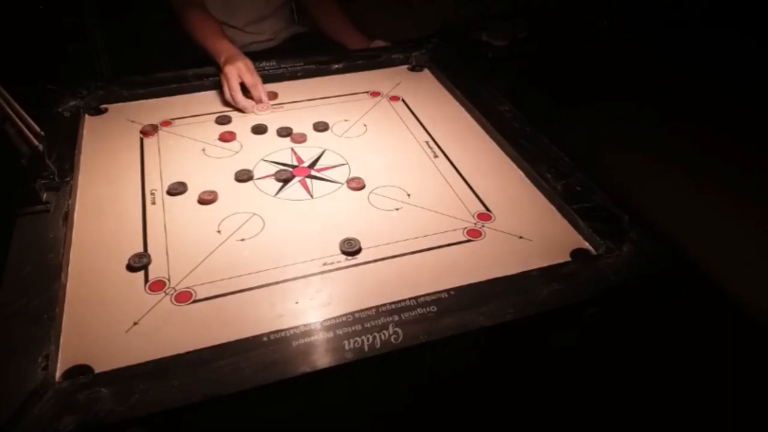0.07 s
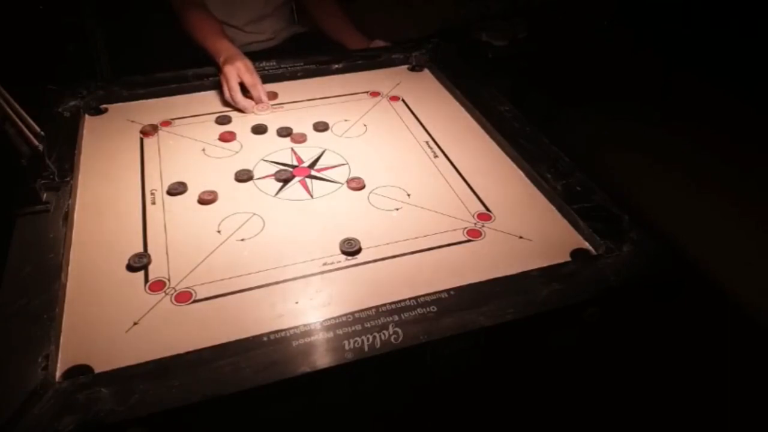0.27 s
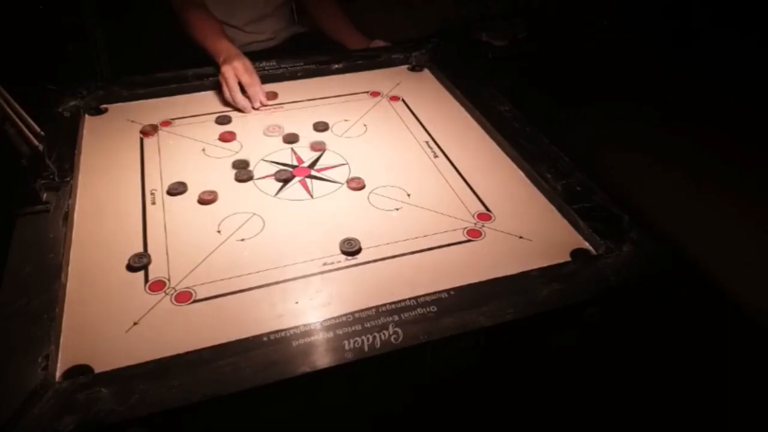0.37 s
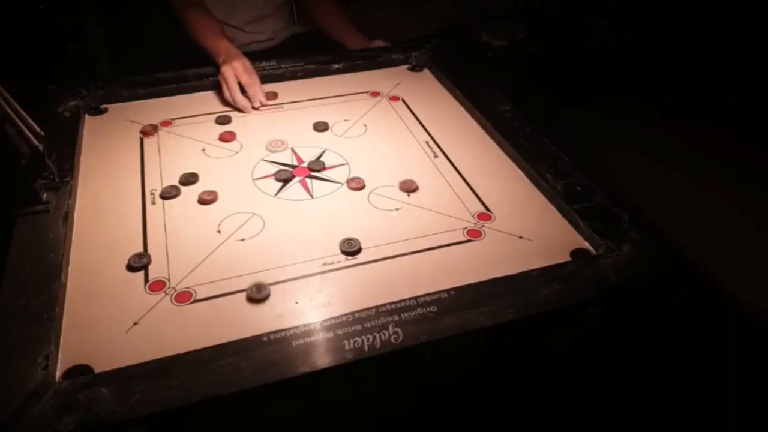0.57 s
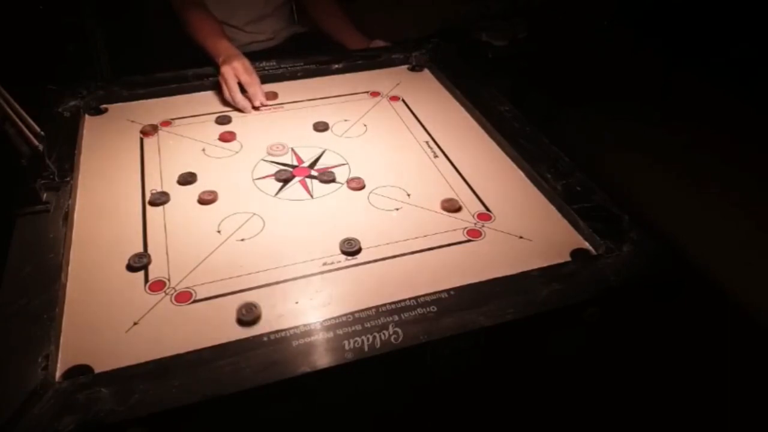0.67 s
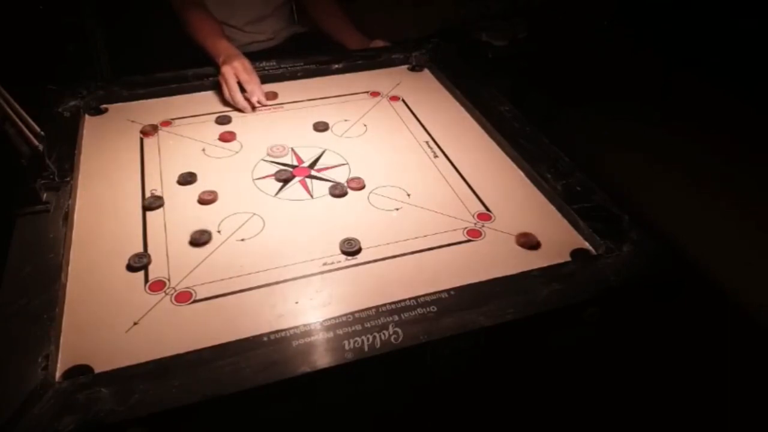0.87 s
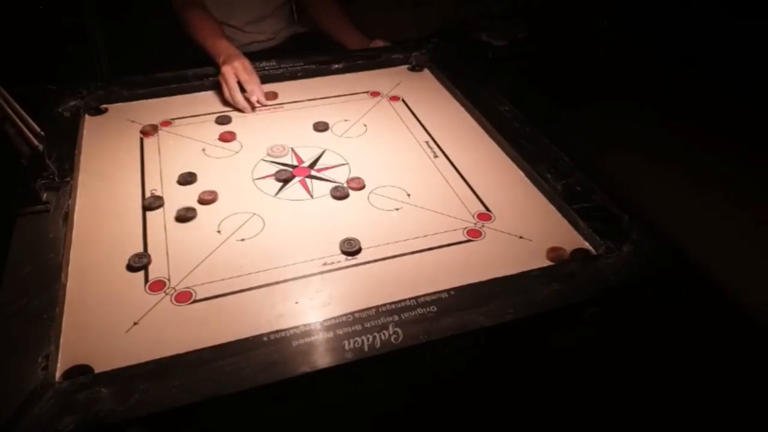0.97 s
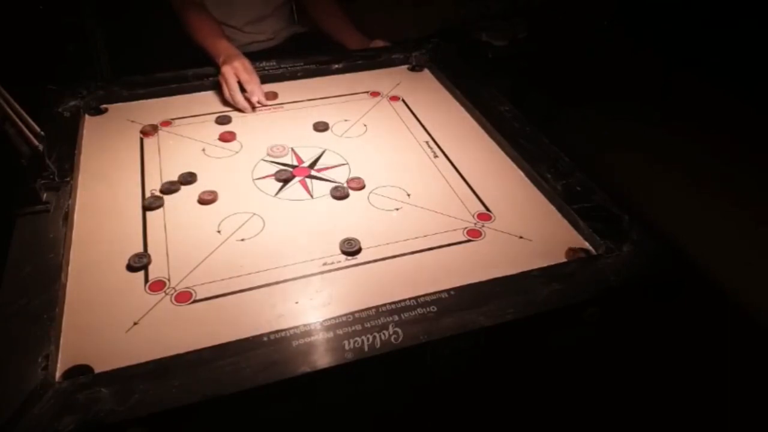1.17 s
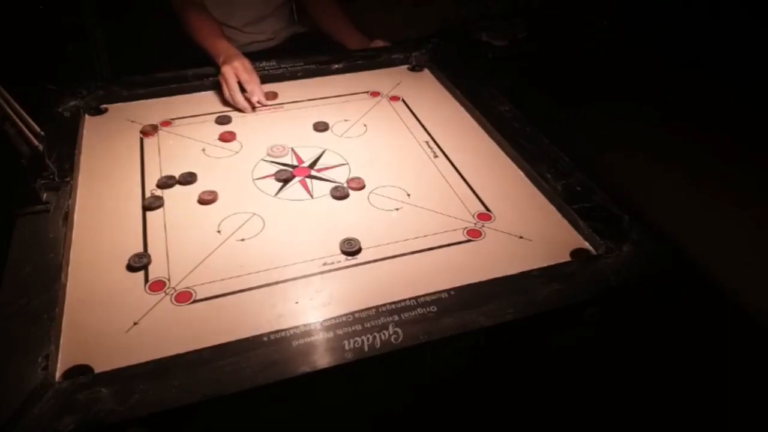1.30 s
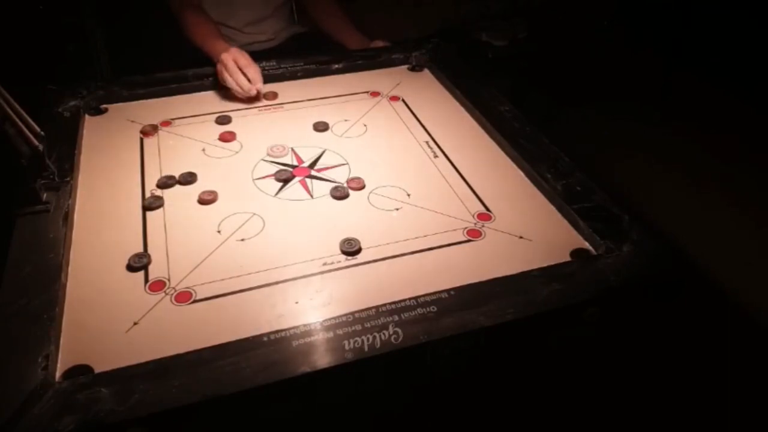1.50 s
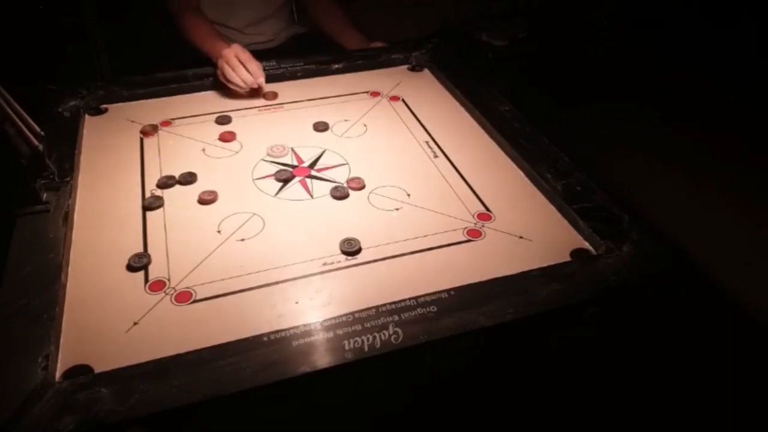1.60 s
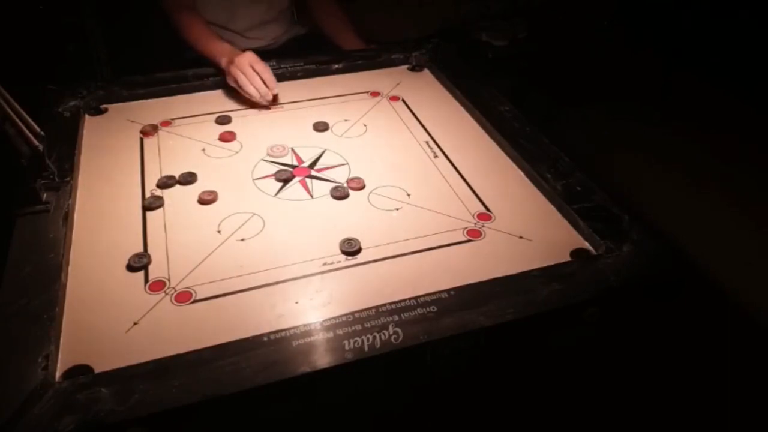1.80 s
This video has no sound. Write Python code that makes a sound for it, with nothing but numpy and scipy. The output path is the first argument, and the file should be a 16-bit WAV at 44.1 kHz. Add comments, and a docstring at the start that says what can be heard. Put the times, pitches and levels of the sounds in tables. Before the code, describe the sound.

Sharp wooden clacks and knocks of one carrom shot, echoing briefly in a quiet room.

```python
"""A carrom shot in a quiet room

A finger flicks the striker, which skids and drums over the plywood and clacks into wooden discs.
Discs knock against the frame and excite its modes; the hard-walled room reverberates after each blow.
Near the end a hand brushes the board. A low rumble and a faint mains hum lie underneath."""
import sys
import numpy as np
from scipy import signal
from scipy.fft import irfft
from scipy.io import wavfile

SR = 44100
rng = np.random.default_rng(int(sys.argv[2]) if len(sys.argv) > 2 else 0)


def pcm_store(signal):
    """Save signal as 16-bit PCM."""
    levels = np.round(np.clip(np.atleast_2d(signal), -1, 1) * 32767)
    wavfile.write(sys.argv[1], SR, levels.astype(np.int16).T)


N = 81585
T = np.arange(N) / SR
HZ = np.fft.rfftfreq(N, 1 / SR)


def amp(db):
    """Converts decibels to an amplitude ratio."""
    return 10 ** (np.asarray(db) / 20)


def curve_at(points, hz):
    """Interpolates a curve on a logarithmic frequency axis."""
    f, value = np.transpose(points)
    return np.interp(np.log(hz + 1), np.log(f + 1), value)


def unit(x):
    """Normalises to unit energy."""
    return x / np.sqrt(np.sum(x ** 2) + 1e-30)


def conv(a, b):
    """Convolution, padded or cut to the scene's length."""
    return np.pad(signal.fftconvolve(a, b), (0, N))[:N]


def add(mix, start_s, sound):
    """Superposition: adds a sound at a given time."""
    part = mix[max(round(start_s * SR), 0):][:len(sound)]
    part += sound[:len(part)]


def noise(gain):
    """Random phases turn an amplitude spectrum into stationary noise of unit rms."""
    return unit(irfft(gain * np.exp(2j * np.pi * rng.random(len(HZ))), N)) * np.sqrt(N)


def pulse(spectrum, tilt_db=0, top_hz=SR, low_hz=1, size=2048):
    """Minimum phase gives the shortest causal pulse of a spectrum, tilted per octave above 1 kHz."""
    hz = np.maximum(abs(np.fft.fftfreq(size, 1 / SR)), SR / size)
    gain = amp(curve_at(spectrum, hz) + tilt_db * np.log2(np.maximum(hz, 1000) / 1000))
    gain = gain / np.sqrt(1 + (hz / top_hz) ** 4 + (low_hz / hz) ** 6) + 1e-5
    log_response = np.conj(signal.hilbert(np.log(gain)))
    return unit(np.fft.ifft(np.exp(log_response)).real)


def ring(modes, rise_s, pitch=1, top_hz=SR):
    """Free vibration is a sum of damped modes; a soft contact barely excites the high ones."""
    t = T[:SR // 2]
    tones = np.zeros(len(t))
    for k, (hz, db, t60) in enumerate(modes):
        mode = amp(db - 60 * t / t60) * np.sin(2 * np.pi * hz * pitch * t)
        tones += (-1) ** k * mode / np.hypot(1, (hz * pitch / top_hz) ** 2)
    return unit(tones * np.minimum(t / rise_s, 1))


def burst(t60_s, rise_s):
    """Modal overlap: dense, short-lived vibrations merge into decaying noise."""
    t = T[:SR // 4]
    envelope = np.minimum((t + 1 / SR) / rise_s, 1) * amp(-60 * t / t60_s)
    return unit(rng.choice([-1., 1.], len(t)) * envelope)


# Spectrum of the room's air: (frequency [Hz], relative level [dB])
AIR_SPECTRUM = [(22, -63.5), (32, -39), (42, -3.5), (60, -10), (85, -11), (125, -8.5), (165, -20),
                (240, -14), (350, -26), (450, -21), (700, -23), (950, -27.5), (1150, -26), (1750, -38.5),
                (2450, -33), (3400, -48), (5200, -51), (7500, -47.5), (9700, -61.5), (12000, -55),
                (15000, -61.5)]
# Bands of rumble and hum: (centre frequency [Hz], bandwidth [Hz], level before any swell [dB])
HUM_BANDS = [(46.6, 9, -51.5), (99.6, 6.9, -60.5), (195.4, 6, -71.5), (284.2, 27, -68), (770.5, 120, -67)]
# Swell of the two lowest bands: (time [s], gain [dB])
RUMBLE_SWELL = [(0, -19), (0.27, 3), (0.52, -8.5), (0.65, -5), (0.93, 5.5), (1.1, -9.5), (1.35, -10.5),
                (1.52, 4.5), (1.85, -9.5)]
def background(air_db=-52.5):
    """Ambient noise: broadband air and narrow bands of hum, the lowest two amplitude-modulated."""
    bands = [amp(db) * noise(1 / (1 + (2 * (HZ - hz) / width) ** 4)) for hz, width, db in HUM_BANDS]
    swell = amp(np.interp(T, *np.transpose(RUMBLE_SWELL)))
    air = amp(air_db) * noise(amp(curve_at(AIR_SPECTRUM, HZ)))
    return air + sum(bands[:2]) * swell + sum(bands[2:])


# Spectrum of the grainy hiss: (frequency [Hz], relative level [dB])
HISS_SPECTRUM = [(200, -12.5), (1700, -3), (2600, -6), (3600, -5.5), (4800, -10.5), (5800, -2.5),
                 (6600, -6), (7900, -2), (9400, -10.5), (11500, -4.5), (15000, -16.5)]
# Thin ring in the hiss: (frequency [Hz], relative level [dB], T60 [s])
HISS_MODES = [(5810, 0, .015), (8134, -1.5, 0.013), (9300, -0.5, 0.017)]
# A faint high hiss dying away at the start, before the flick; the later rows are slides on the board:
# (start [s], duration [s], initial level [dB], level change [dB], tilt [dB/octave])
HISSES = [(0, 0.071, -66.5, -13, 0.5), (0.159, 0.052, -67.5, 1.5, -4.5), (0.2063, 0.081, -38, -5.5, -3),
          (0.367, 0.68, -58, -2.5, -5.5), (1.607, 0.088, -68, -4.5, 0.5)]
def hisses(attack_s=0.0092, release_s=0.01, grain_db=3, modes_db=-14):
    """A faint high hiss dies away; later, sliding friction makes the discs hiss and ring thinly."""
    out = np.zeros(N)
    resonance = amp(modes_db) * ring(HISS_MODES, rise_s=0.0001)
    resonance[0] += 1  # the grains are also heard directly
    for start, length, db, change_db, tilt_db in HISSES:
        grains = rng.standard_normal(N) * amp(grain_db * rng.standard_normal(N))
        hiss = unit(conv(conv(grains, resonance), pulse(HISS_SPECTRUM, tilt_db))) * np.sqrt(N)
        envelope = np.minimum(T / attack_s, 1) * np.exp(-np.maximum(T - length, 0) / release_s)
        add(out, start, hiss * envelope * amp(db + change_db * np.minimum(T / length, 1)))
    return out


# Spectrum of a blow on the plywood: (frequency [Hz], relative level [dB])
BOARD_SPECTRUM = [(100, -17), (280, -13), (400, -2.5), (650, -4), (1100, -9.5), (1750, -7), (2300, -24),
                  (5000, -16.5), (14000, -38.5)]
# Modes of the playing surface: (frequency [Hz], relative level [dB], T60 [s])
BOARD_MODES = [(384, 0, 0.12), (478, 1.5, 0.15), (660, 0, 0.12), (735, -11, .55), (920, -9, 0.08),
               (1167, -12.5, 0.13), (1704, 1.5, 0.115), (1972, -6, 0.065)]
# Bumps of the striker: (time [s], board level [dB], room level [dB], upper cutoff [Hz])
BUMPS = [(0.2105, -8, -10.5, 3000), (0.2170, -12, -15, 6040), (0.2350, -8, -17, 2200),
         (0.2612, -14, -20.5, 9270), (0.3207, -13, -16, 1000)]
def bumps(rise_s=0.00017, modes_db=0.5, contact_db=-9.5):
    """Plate vibration: the striker wobbles and drums on the plywood when flicked and on hitting discs."""
    out = np.zeros(N)
    for start, board_db, room_db, top_hz in BUMPS:
        blow = pulse(BOARD_SPECTRUM, top_hz=top_hz)
        wood = unit(conv(burst(t60_s=0.06, rise_s=rise_s), blow))
        add(wood, 0, amp(modes_db) * ring(BOARD_MODES, rise_s, top_hz=top_hz))
        add(wood, 0, amp(contact_db) * blow)
        add(out, start, amp(board_db) * unit(wood) + amp(room_db) * conv(room(), blow))
    return out


# Reverberation time of the room: (frequency [Hz], T60 [s])
ROOM_T60 = [(200, 0.98), (700, 0.45), (1700, 0.47), (4500, 0.48), (8000, 0.4), (13000, 0.38)]
# Lightly damped modes of board and frame: (frequency [Hz], relative level [dB], T60 [s])
LONG_MODES = [(476, 2.5, 0.46), (731, 7, 0.75), (1210, 2, .5), (1375, -5, .45), (1570, -6, 0.56),
              (1936, 0, 0.8), (2960, -1, 0.47), (4054, -1, .42), (5005, 1, .42), (5150, -1, 0.45),
              (5583, 1.5, 0.55), (5640, 0.5, 0.55), (5910, -0.5, .45), (7154, -3, .38), (8100, -0.5, 0.36)]
def room(delay_s=0.004, rise_s=0.014, modes_db=-22.5):
    """Reverberation: a diffuse field that lasts longest in the bass, with the wood's long ring in it."""
    hz, t, spectra = signal.stft(rng.choice([-1., 1.], N), SR, nperseg=256)
    decay = amp(-60 * t / curve_at(ROOM_T60, hz)[:, None])
    tail = signal.istft(spectra * decay, SR, nperseg=256)[1][:N]
    modes = sum(amp(db - 60 * T / t60) * np.sin(2 * np.pi * (f * T + rng.random()))
                for f, db, t60 in LONG_MODES)
    build_up = np.clip((T - delay_s) / rise_s, 0, 1)
    return unit((unit(tail) + amp(modes_db) * unit(modes)) * build_up)


# Spectrum of a disc's hard contact: (frequency [Hz], relative level [dB])
CLICK_SPECTRUM = [(100, -36), (650, -22.5), (1050, -8), (1500, -6.5), (3000, -3.5), (5800, -1),
                  (7600, -5.5), (9500, -6), (12000, -13), (15000, -21.5)]
# Modes of a struck disc: (frequency [Hz], relative level [dB], T60 [s])
DISC_MODES = [(3955, -15.5, 0.00061), (5800, -3, 0.0025), (7940, 9, 0.0032)]
# Reflections off the frame and nearby surfaces: (delay [ratio to the main echo's], gain [ratio])
ECHOES = [(0.331, 0.19), (0.999, 0.38), (1.42, 0.19), (1.6, 0.22)]
def click(tilt_db, top_hz, echo_s, scatter_db=-6, low_hz=1, modes_db=-13):
    """Multipath: a disc's contact and brief ring arrive directly, by reflection and by scattering."""
    paths = amp(scatter_db) * burst(t60_s=0.055, rise_s=0.00017)
    paths[0] += 1  # direct sound
    for share, gain in ECHOES:
        add(paths, share * echo_s, np.array([gain]))
    disc = amp(modes_db) * ring(DISC_MODES, rise_s=0.0001)
    disc[0] += 1  # the contact itself
    contact = pulse(CLICK_SPECTRUM, tilt_db, top_hz, low_hz)
    return conv(paths, unit(conv(disc, contact)))


# Collisions of disc on disc: (time [s], click level [dB], room level [dB], tilt [dB/octave],
# lower cutoff [Hz], upper cutoff [Hz], echo delay [s], scatter level [dB])
CLACKS = [(0.2955, -0.3, -4.5, -0.5, 300, 8700, 0.0031, -3.5), (0.3179, -2, 1, 2, 1210, 21500, 0.0034, -4),
          (0.3622, 1.7, 0, 1.9, 1210, 14900, .0045, -8),
          (0.5150, -16.5, -12.5, -4.5, 1290, 5500, 0.0032, 0.5),
          (1.0054, -23, -15.5, -3.7, 699, 3150, 0.0037, 7)]
def clacks():
    """Impact of disc on disc: the contact time limits the treble of a click that excites the room."""
    out = np.zeros(N)
    for start, click_db, room_db, tilt_db, low_hz, top_hz, echo_s, scatter_db in CLACKS:
        add(out, start, amp(click_db) * click(tilt_db, top_hz, echo_s, scatter_db, low_hz))
        reverberation = conv(room(), unit(click(tilt_db, top_hz, echo_s, low_hz=low_hz)))
        add(out, start, amp(room_db) * reverberation)
    return out


# Spectrum of a blow on the frame: (frequency at pitch 1 [Hz], relative level [dB])
FRAME_SPECTRUM = [(100, -20), (400, -20.5), (750, -15), (1050, -2), (1330, -1.8), (1700, -3.2), (2400, -5),
                  (4000, -5.5), (6500, -6), (9600, -7.5), (12000, -13), (15000, -34)]
# Modes of the frame: (frequency at pitch 1 [Hz], relative level [dB], T60 [s])
FRAME_MODES = [(540, -21.5, 0.12), (713.6, -20.5, 0.11), (877, -13.5, 0.11), (1130, -15, 0.052),
               (1300, 1.5, 0.033), (1453, 3.5, 0.017), (1555, -13, 0.14), (1914, -12, 0.1),
               (2118, -17.5, 0.084), (3394, -16.5, 0.099), (3876, -14, 0.068), (4760, -19.5, 0.09),
               (6180, -10, 0.033), (8700, -12.5, 0.07)]
# Heavy blows that make the wood ring: (time [s], click level [dB], wood level [dB], room level [dB], # tilt
# [dB/octave], upper cutoff [Hz], pitch [ratio])
KNOCKS = [(0.3207, -5, -0.3, 2.3, 2.2, 20000, 1.06), (0.6093, -2, 4.1, 5, 0.7, 10300, 1.0)]
def knocks(rise_s=0.0028, wood_delay_s=0.0012, modes_db=-3.5, room_modes_db=-5):
    """Resonance: a heavy blow clicks, and the wood's hollow note swells and dies away."""
    out = np.zeros(N)
    for start, click_db, wood_db, room_db, tilt_db, top_hz, pitch in KNOCKS:
        blow = pulse([(hz * pitch, db) for hz, db in FRAME_SPECTRUM], tilt_db, top_hz)
        note = ring(FRAME_MODES, rise_s, pitch, top_hz)
        wood = unit(conv(burst(t60_s=0.083, rise_s=rise_s), blow))
        add(wood, 0, amp(modes_db) * note)
        radiated = amp(room_modes_db) * note
        add(radiated, 0, blow)
        add(out, start, amp(click_db) * click(tilt_db - 1, top_hz, echo_s=0.0054))
        reverberation = conv(room(), unit(radiated))
        add(out, start + wood_delay_s, amp(wood_db) * unit(wood) + amp(room_db) * reverberation)
    return out


# Spectrum of a hand rubbing the board: (frequency [Hz], relative level [dB])
BRUSH_SPECTRUM = [(150, 4.5), (700, 6), (2000, 1.5), (3500, -5.5), (6000, -6), (9000, -16), (12000, -20),
                  (15000, -34)]
# Envelope of the stroke: (time [s], level [dB])
BRUSH_ENVELOPE = [(1.702, -72), (1.71, -54), (1.735, -51.5), (1.765, -56), (1.85, -68)]
def hand_brush():
    """Friction between hand and board radiates a brief, soft noise."""
    times, db = np.transpose(BRUSH_ENVELOPE)
    envelope = amp(np.interp(T, times, db)) * (T > times[0])
    return noise(amp(curve_at(BRUSH_SPECTRUM, HZ))) * envelope


def scene():
    """Superposition: the pressures of all sources add at one microphone."""
    return (clacks() + knocks() + bumps() + hisses() + hand_brush() + background())[None]


def record(dry, centre_hz=5700, width_hz=3400, cutoff_hz=15100):
    """Phase dispersion in the microphone spreads each click over a few cycles; a low-pass follows."""
    radius = np.exp(-np.pi * width_hz / SR)
    denominator = [1, -2 * radius * np.cos(2 * np.pi * centre_hz / SR), radius ** 2]
    dispersed = signal.lfilter(denominator[::-1], denominator, dry)  # all-pass
    low_pass = signal.firwin(161, cutoff_hz, window=("kaiser", 9), fs=SR)
    return signal.oaconvolve(dispersed, low_pass[None], "same")


dry = scene()
out = record(dry)
pcm_store(out)
```